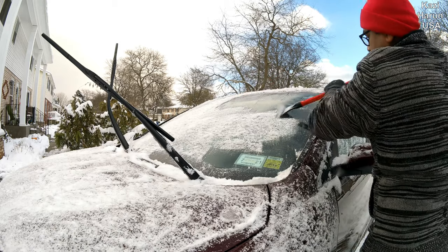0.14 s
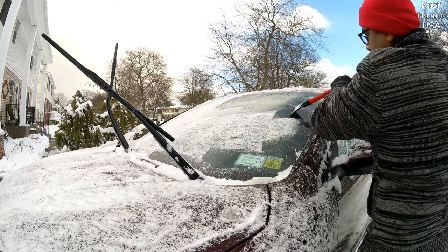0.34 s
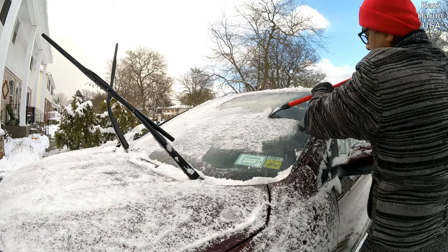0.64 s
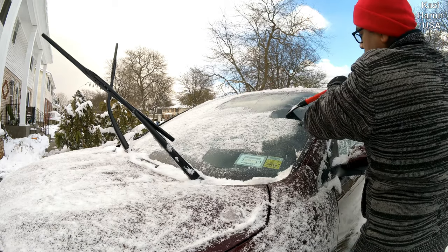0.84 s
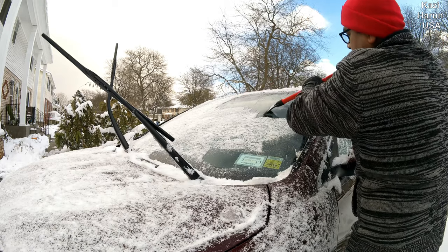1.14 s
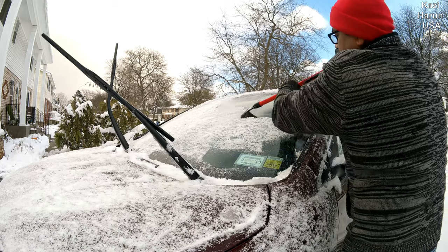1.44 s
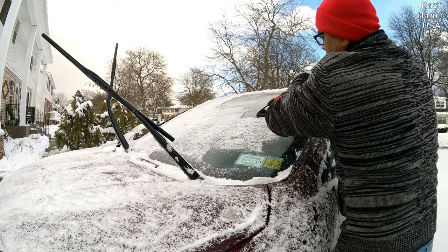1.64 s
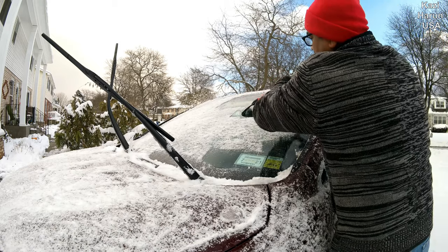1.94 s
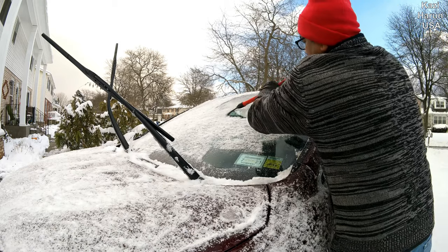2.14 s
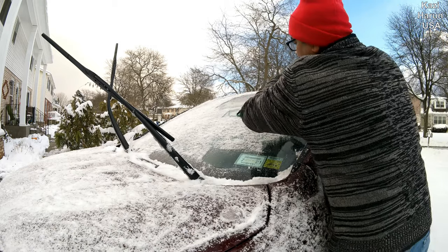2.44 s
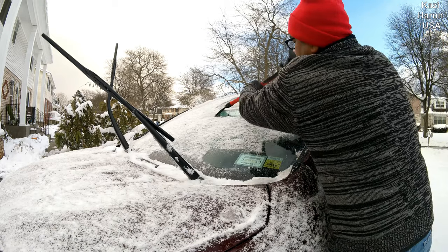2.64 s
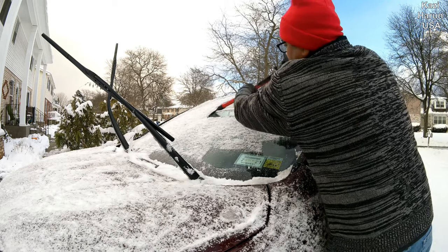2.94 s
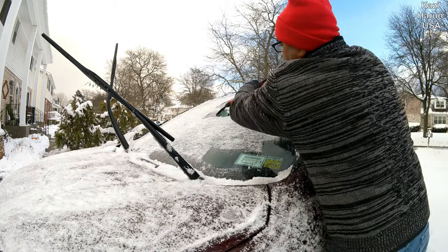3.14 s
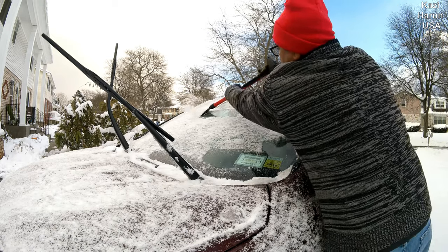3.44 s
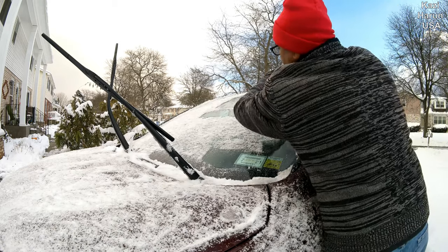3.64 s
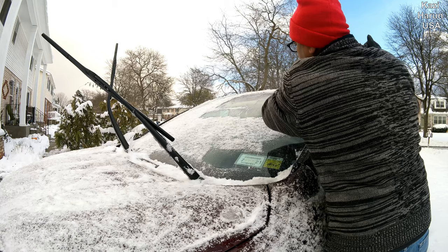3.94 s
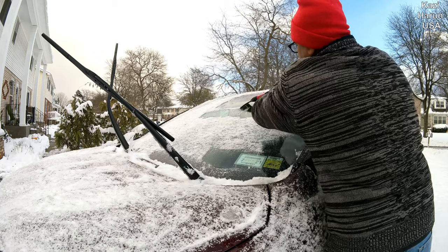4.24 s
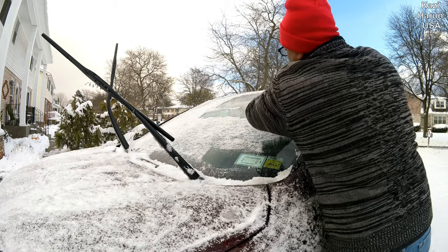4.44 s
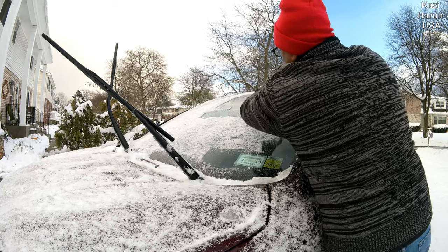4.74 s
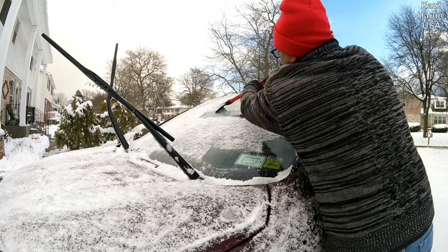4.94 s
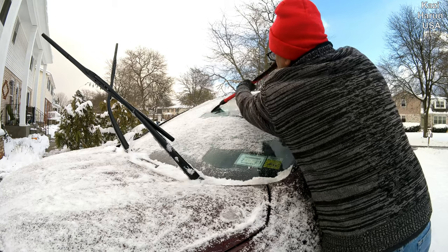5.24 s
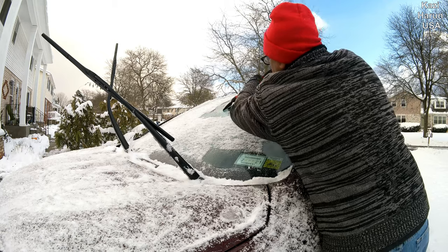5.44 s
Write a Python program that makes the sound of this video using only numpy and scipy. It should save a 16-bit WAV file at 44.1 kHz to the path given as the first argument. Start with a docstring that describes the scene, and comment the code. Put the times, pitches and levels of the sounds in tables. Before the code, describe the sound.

A plastic scraper crunches ice off a windshield in quick, regular strokes, with sharp knocks on the glass and faint distant traffic.

```python
"""A plastic scraper clears ice from a windshield: crunching pushes from 0.13 s, about 0.4 s apart, until 3.4 s.
Each push opens with a crack, shatters ice in stick-slip clusters, booms the pane and sheds chips.
Between pushes the blade rattles over frost (noise bursts in hops) and knocks on the glass (decaying cracks).
From 3.6 s mostly knocks; from 4.16 s five more pushes, mostly weaker, with few slides between.
Throughout: diffuse return from house fronts and filtered-noise traffic, slowly receding; crumbs after push 1."""
import sys
import numpy as np
from scipy import signal
from scipy.fft import rfft, irfft
from scipy.io import wavfile
from scipy.ndimage import uniform_filter1d

SR = 44100
rng = np.random.default_rng(int(sys.argv[2]) if len(sys.argv) > 2 else 0)


def generate_wav(sig):
    """Save sig (samples, or channels by samples) to the path in sys.argv[1] as 16-bit PCM at SR."""
    pcm = np.round(np.clip(np.atleast_2d(sig).T, -1, 1) * 32767).astype(np.int16)
    wavfile.write(sys.argv[1], SR, pcm)


N = 246959
TIME = np.arange(N) / SR  # s


def undb(db):
    """Decibels to gain."""
    return 10 ** (np.asarray(db) / 20)


def unit(x):
    """Scale to rms 1."""
    return x / np.sqrt(np.mean(x ** 2))


def through(x, response):
    """Convolve x with an impulse response scaled to unit energy."""
    return signal.fftconvolve(x, response / np.linalg.norm(response))[:len(x)]


def colour(x, points, size=4096):
    """Minimum-phase filter with the given (Hz, dB) outline, from the folded cepstrum."""
    hz, db = np.transpose(points)
    grid_hz = np.maximum(np.fft.rfftfreq(size, 1 / SR), 1)
    outline_db = np.interp(np.log(grid_hz), np.log(hz), db)
    cepstrum = irfft(np.log(undb(outline_db)))
    cepstrum[1:size // 2] *= 2
    cepstrum[size // 2 + 1:] = 0
    return through(x, irfft(np.exp(rfft(cepstrum))))


def fade(t60_s):
    """One second of exponential decay, -60 dB in amplitude at t60_s."""
    return np.exp(-np.log(1000) * TIME[:SR] / t60_s)


def scatter(x, t60_s):
    """Diffuse ringing: many overlapping paths that die away together."""
    return through(x, rng.standard_normal(SR) * fade(t60_s))


def walk(rate_hz):
    """Smooth random wandering, spread a little under 1."""
    step = max(int(SR / rate_hz), 1)
    held = np.repeat(rng.standard_normal(N // step + 1), step)[:N]
    return uniform_filter1d(held, step)


def lowpass(x, order, hz):
    """Butterworth low-pass."""
    return signal.sosfilt(signal.butter(order, hz, fs=SR, output="sos"), x)


def fractures(per_s, spread_db):
    """Tiny breaks at random times, random sign; sizes exponential in dB, capped at 4 spreads."""
    size = undb(spread_db * np.minimum(rng.exponential(size=N), 4))
    hit = rng.random(N) < per_s / SR
    return unit(hit * size * rng.choice([-1, 1], N))


def slips(per_s, spread_db, t60_s, steady):
    """Stick-slip: the edge lets go at uneven intervals (median 1/per_s), surging over steady rubbing."""
    chance = rng.standard_normal((4000, 2))
    interval = np.exp(.45 * chance[:, 0]) * SR / per_s
    at = np.cumsum(interval).astype(int)
    kicks = np.bincount(at, undb(spread_db * chance[:, 1]), minlength=N)[:N]
    surge = steady + unit(through(kicks, fade(t60_s)))
    # divide by the running rms over 1100 samples, so loudness stays even from slip to slip
    return surge / np.sqrt(uniform_filter1d(surge ** 2, size=1100))


def stroke(start, end, level_db, edge_s):
    """Gain of one stroke: its level while the blade touches, zero while it is lifted."""
    gain = undb(level_db) * (TIME > start) * (TIME < end)
    return uniform_filter1d(gain, max(int(edge_s * SR), 1))


def arch(start, end, place, rise_db, fall_db):
    """Level in dB through a stroke: up to 0 at the given place (0-1), then down again."""
    height = start + np.clip(place, .01, .99) * (end - start)
    return np.interp(TIME, [start, height, end], [-rise_db, 0, -fall_db])


def spot(x, t60_s, ring_db, size=2048):
    """Each place on the glass rings briefly with its own set of close modes."""
    ring = rng.standard_normal(size) * fade(t60_s)[:size]
    ring *= undb(ring_db) / np.linalg.norm(ring)
    ring[0] += 1  # direct sound
    return signal.oaconvolve(x, ring / np.linalg.norm(ring))[:N]


def release(at, width_s):
    """The bent pane springs back as the blade lets go: one smooth shove of peak 1."""
    return np.exp(-np.minimum(((TIME - at) / width_s) ** 2, 50))


# blade pushed into ice: start t/s, end t/s, crunch level at height/dB, place of height/0-1,
# treble re crunch/dB, hollow plastic ring re crunch/dB, pane load/dB; mix trims apply to the last three
PUSH_STROKES = [(0.13, 0.213, -22.5, 1, -13.5, -8, -25.5), (0.555, 0.598, -23, .2, -8, -9, -28.5),
                (0.641, 0.671, -23, 0.13, -11.5, -39, -26), (0.964, 1.033, -20, 0.24, -11, -23, -28.5),
                (1.356, 1.423, -22.5, 0.7, -10.5, -23, -28), (1.74, 1.816, -21.5, 0.37, -10, -8.5, -36),
                (2.136, 2.21, -24, 0.77, -7.5, -1.5, -27.5), (2.527, 2.603, -21.5, .5, -8.5, -6.5, -28.5),
                (2.948, 3.012, -24, 0.42, -5, -3.5, -27.5), (3.335, 3.431, -24, 0.76, -4.5, -6, -30),
                (4.162, 4.228, -29, 0.16, -12.5, 1, -32.5), (4.472, 4.488, -25.5, 0.15, -28, 1.5, -23.5),
                (4.525, 4.597, -27.5, 0.28, -8.5, -1, -32), (4.873, 4.938, -24, 0, -7.5, -5, -32.5),
                (5.24, 5.288, -28, 0.3, -5, -8, -30)]
# spectra: f/Hz, level/dB per Hz (relative)
CRUNCH_SPECTRUM = [(60, -33.5), (200, 8), (400, 1), (700, -8), (1050, -0.5), (1480, 6), (1850, -0.5),
                   (2150, -2), (3000, -2.5), (3900, -3), (6000, -14.5), (8000, -30.5), (16000, -38)]
BLADE_SPECTRUM = [(60, -37), (260, -20.5), (380, -11.5), (600, -10), (880, -4), (1250, -10.5), (1480, -11),
                  (2100, -24.5), (4000, -40.5), (16000, -35)]
SPLINTER_SPECTRUM = [(2000, -32), (5000, -1.5), (7000, -2.5), (9300, 2), (11500, -4), (14000, -2),
                     (16000, -15)]
PUSH_RISE_DB, PUSH_FALL_DB = 4.5, 5.5  # crunch builds to its height, then eases
LOAD_RISE_DB = 4  # the arm leans harder through a push
CHATTER_PER_S, CHATTER_DB = 75, 1.0  # thick and thin ice crossed by the edge
PUSH_STEADY = .38  # rubbing under the slips, re their rms


def pushes():
    """The edge catches and slips, breaking ice in clusters. Returns crunch and force on the pane."""
    chatter = undb(CHATTER_DB * walk(CHATTER_PER_S))
    catching = chatter * slips(per_s=380, spread_db=2.0, t60_s=.012, steady=PUSH_STEADY)
    body = colour(catching * fractures(per_s=12000, spread_db=0.5), CRUNCH_SPECTRUM)
    head = colour(catching * fractures(per_s=6400, spread_db=2.0), BLADE_SPECTRUM)
    splinters = colour(catching * fractures(per_s=20000, spread_db=6.5), SPLINTER_SPECTRUM)
    judder = unit(catching * rng.standard_normal(N))
    crunch, force = 0, 0
    for start, end, crunch_db, place, treble_db, hollow_db, load_db in PUSH_STROKES:
        ice = undb(-1.07) * body
        ice = ice + undb(hollow_db - 1.0) * head
        ice = ice + undb(treble_db + 1.0) * splinters
        effort_db = crunch_db + arch(start, end, place, PUSH_RISE_DB, PUSH_FALL_DB)
        effort = stroke(start, end, effort_db, edge_s=0.0041)
        crunch = crunch + spot(effort * ice, t60_s=0.026, ring_db=-6.5)
        lean_db = load_db + LOAD_RISE_DB * np.interp(TIME, [start, end], [-.5, .5])
        force = force + undb(-2.0) * judder * stroke(start, end, lean_db, edge_s=0.0042)
        force = force + undb(load_db - 10) * release(end - .006, width_s=0.00085)
    return crunch, force


# light slides over frost: start t/s, end t/s, rattle level at height/dB, place of height/0-1,
# pane load re rattle/dB (high going into a push, low on the way back)
FROST_SLIDES = [(0.379, 0.452, -37, .45, 10), (.532, .642, -34.5, 0.16, 11), (0.697, 0.724, -32, 0.49, 7),
                (1.483, 1.539, -34, 0.36, 0), (1.828, 2.018, -28, 0.66, 5.5),
                (2.085, 2.152, -26, 0.52, 10.5), (2.274, 2.408, -30, 0.33, -1.5),
                (2.452, 2.539, -27, 0.92, 11), (2.64, 2.798, -28.5, 0.52, -1.5),
                (2.9, 2.946, -27.5, 0.89, 3), (3.048, 3.248, -24, 0.45, -1.5),
                (3.276, 3.34, -27.5, 0.77, 7.5), (3.445, 3.547, -29.5, 0.22, 7),
                (4.33, 4.363, -37, 0.87, 3), (4.965, 5.006, -36, 1, 5)]
# f/Hz, level/dB per Hz (relative)
FROST_SPECTRUM = [(1000, -13), (2100, 0), (2900, 6), (3700, 2.5), (4900, -4), (5700, 2), (6300, 0),
                  (7200, -15.5), (8800, -2.5), (10300, -19), (11800, -15), (14000, -18), (16000, -34)]
DRAG_RISE_DB, DRAG_FALL_DB = 12, 11.5  # rattle swells and fades with the speed of the arm
FROST_DB = -10.5  # hiss re blade head
DRAG_STEADY = .24  # rubbing under the slips, re their rms


def drags():
    """Unloaded blade hops over frost, ringing its plastic head. Returns rattle and force on the pane."""
    bumps = undb(0.75 * walk(45))
    hops = unit(bumps * slips(per_s=240, spread_db=4.0, t60_s=0.014, steady=DRAG_STEADY))
    head = colour(hops * fractures(per_s=7000, spread_db=1.5), BLADE_SPECTRUM)
    # the edge keeps hissing through the frost between hops
    grazing = unit(hops + 0.75)
    frost = colour(grazing * fractures(per_s=4200, spread_db=3.5), FROST_SPECTRUM)
    rattle, force = 0, 0
    for start, end, rattle_db, place, load_db in FROST_SLIDES:
        level_db = rattle_db + arch(start, end, place, DRAG_RISE_DB, DRAG_FALL_DB)
        pressure = stroke(start, end, level_db, edge_s=0.005)
        slide = spot(pressure * (head + undb(FROST_DB) * frost), t60_s=0.015, ring_db=-5.5)
        rattle = rattle + slide
        force = force + undb(load_db) * slide
    return rattle, force


# blade on glass and ice ridges: t/s, peak level/dB, sharpness (treble against body, before trim)/dB
GLASS_KNOCKS = [(0.259, -25.5, -6), (0.4023, -6.5, -3.5), (.533, -19, -19), (.563, -6, -4.5),
                (0.696, -22.5, 2), (0.721, -18, -11), (1.138, -28.5, -21), (1.466, -13, -7),
                (1.476, -15.5, -13), (1.592, -35, 2), (1.718, -31, -12), (1.873, -19.5, -30),
                (1.915, -18.5, 13), (2.088, -27, -20), (2.291, -21, -24), (2.641, -13.5, -16),
                (2.664, -11.5, -14), (2.833, -17.5, -23), (2.911, -21.5, -21), (3.061, -20.5, 5),
                (3.49, -20, 9), (3.612, -27.5, -26), (3.73, -27, -10), (3.752, -29.5, -22),
                (4.073, -33, -24), (4.153, -26, -10), (4.17, -16.5, -11), (4.296, -25.5, -26),
                (4.356, -22, -15), (4.511, -21.5, -22), (4.888, -14, -11), (5.189, -36.5, -11),
                (5.229, -24.5, -11), (5.264, -13, -9), (5.398, -33, -1)]
# f/Hz, level/dB per Hz (relative)
KNOCK_SPECTRUM = [(60, -10), (300, -9), (600, -1.5), (950, 5), (1450, 5), (2200, -5.5), (3200, -6),
                  (4300, -9.5), (6500, -12), (11000, -14), (16000, -20.5)]
KNOCK_RISE_S = 0.00038  # the ice yields a little before it cracks
BITE_S, BITE_DB, BITE_SHARP_DB = .004, 4, 16  # first crack of a push: delay, peak re crunch, sharpness


def knocks(size=4096):
    """A sharp crack under the edge, then a weaker crumbling tail; every push also opens with one."""
    out = np.zeros(N + size)
    rise = 1 - np.exp(-TIME[:size] / KNOCK_RISE_S)
    bites = [(start + BITE_S, crunch_db + BITE_DB, BITE_SHARP_DB)
             for start, _, crunch_db, *_ in PUSH_STROKES]
    for at_s, peak_db, sharp_db in bites + GLASS_KNOCKS:
        crumbling = undb(5.0 * np.repeat(rng.standard_normal(size // 64), 64))
        tail = undb(-11) * crumbling * fade(t60_s=0.035)[:size]
        envelope = rise * (fade(t60_s=0.0095)[:size] + tail)
        crack = colour(envelope * rng.standard_normal(size), KNOCK_SPECTRUM)
        dull = lowpass(crack, 1, 2500)
        snap = undb(8.5) * (crack - dull)
        knock = dull + undb(sharp_db) * snap
        start = int(at_s * SR)
        out[start:start + size] += undb(peak_db) * knock / np.abs(knock).max()
    return out[:N]


# dips in the blade's treble: f/Hz, width/Hz, depth/0-1
TREBLE_DIPS = [(3280, 360, 0.27), (7980, 1460, 0.77), (10430, 780, 1), (13300, 600, 1), (15600, 580, 0.2)]


def blade(x):
    """The blade radiates its treble unevenly, in broad bands with dips between."""
    for hz, width_hz, depth in TREBLE_DIPS:
        b, a = signal.iirpeak(hz, hz / width_hz, fs=SR)
        x = x - depth * signal.lfilter(b, a, x)
    return x


# windshield bending modes: f/Hz, level/dB (relative), t60/s
PANE_MODES = [(69, -14.5, 0.58), (120.4, 0.5, 0.15), (135.4, 8, 0.23), (151, 2.5, 0.065),
              (194.5, 1.5, 0.17), (241.4, -6.5, 0.26), (314, -1, 0.17), (376, 4, 0.11), (454.3, 7, 0.12),
              (672, -1.5, 0.11), (1190, -25, 0.28), (2120, 11, 0.018)]


def pane(force):
    """The windshield booms in its bending modes and rings on after the blade lets go."""
    ring = sum(undb(db) * fade(t60_s) * np.cos(2 * np.pi * hz * TIME[:SR]) for hz, db, t60_s in PANE_MODES)
    # the glass radiates little below its first modes
    band = signal.butter(2, [70, 2600], "bandpass", fs=SR, output="sos")
    return through(force, signal.sosfilt(band, ring))


def chips(crunch):
    """Loosened ice showers down the glass after each push, ending in dull little taps."""
    def falling(decay_s):
        """Smeared crunch envelope; its level drops 30 dB in decay_s."""
        smear = fade(decay_s) / fade(decay_s).sum()
        return np.sqrt(np.abs(signal.fftconvolve(crunch ** 2, smear)[:N]))
    shower = colour(falling(0.18) * rng.standard_normal(N), SPLINTER_SPECTRUM)
    patter = colour(falling(1.1) * fractures(per_s=120, spread_db=-1.5), BLADE_SPECTRUM)
    return undb(-26.5) * shower + undb(-30.5) * scatter(patter, t60_s=0.036)


CRUMBS_PER_S, CRUMB_DB = 40, -57.5


def crumbs():
    """After the first push, loose crumbs of ice tick softly on the car at random."""
    ticks = fractures(per_s=CRUMBS_PER_S, spread_db=5.5) * (TIME > PUSH_STROKES[0][1])
    soft = lowpass(scatter(ticks, t60_s=0.033), 1, 2200)
    return undb(CRUMB_DB) * unit(colour(soft, KNOCK_SPECTRUM))


# f/Hz, level/dB per Hz (relative)
STREET_SPECTRUM = [(12, -36), (20, -0.5), (79, -2), (107, -9), (241, -15.5), (310, -19.5), (802, -22.5),
                   (1150, -28.5), (2990, -37), (7310, -41.5), (9950, -45), (10800, -45), (14300, -36),
                   (16000, -42)]
STREET_START_DB, STREET_FADE_DB_PER_S = -48, 0.72  # far traffic, slowly receding


def street():
    """Far traffic and light air: filtered noise with a slow random swell."""
    swell_db = 0.8 * walk(2.67)
    level_db = STREET_START_DB - STREET_FADE_DB_PER_S * TIME + swell_db
    return undb(level_db) * unit(colour(rng.standard_normal(N), STREET_SPECTRUM))


def scene():
    """Scraper and glass, their faint return from the houses, and the street."""
    crunch, push_force = pushes()
    rattle, slide_force = drags()
    taps = knocks()
    # the sliding blade rocks the pane slowly enough to reach only its lowest modes
    rocking = lowpass(slide_force, 2, 150)
    boom = pane(undb(0.5) * push_force + rocking + undb(-24.5) * rattle + undb(-12.5) * taps)
    near = blade(crunch + rattle + taps + crumbs()) + boom + chips(crunch)
    houses = undb(-18.0) * scatter(near, t60_s=0.45)
    return (near + houses + street())[None]


TOP_HZ = 16000


def record(dry):
    """Steep elliptic low-pass at TOP_HZ."""
    return signal.sosfilt(signal.ellip(10, .2, 80, TOP_HZ, fs=SR, output="sos"), dry)


dry = scene()
out = record(dry)
generate_wav(out)
```